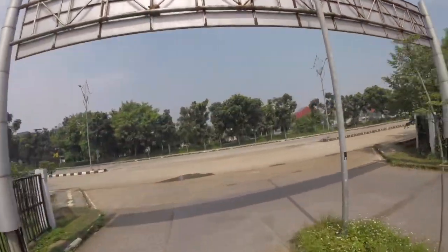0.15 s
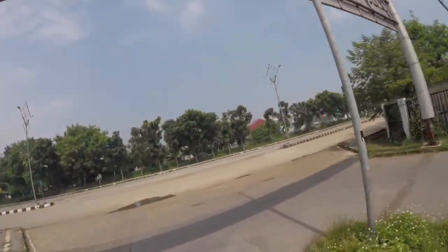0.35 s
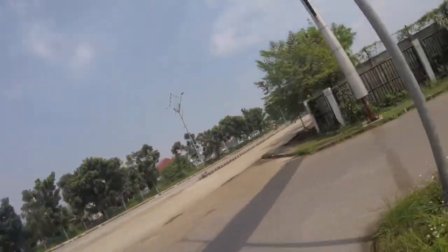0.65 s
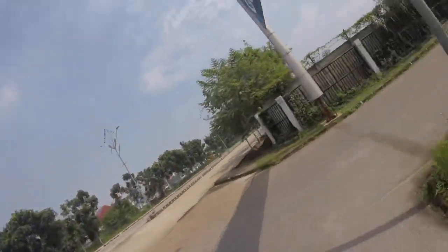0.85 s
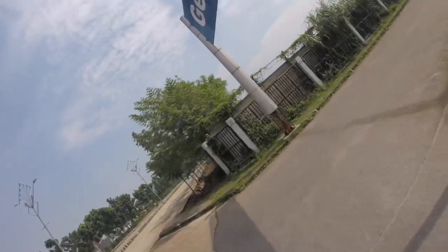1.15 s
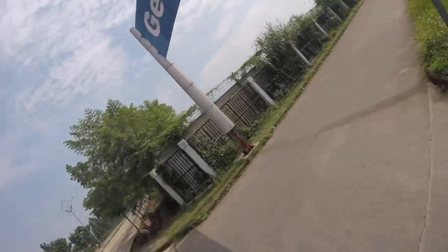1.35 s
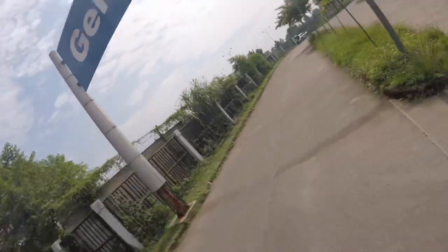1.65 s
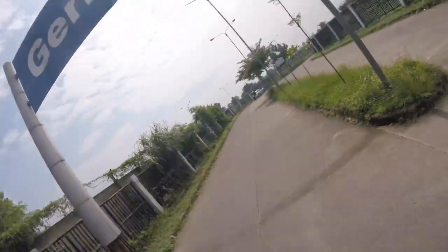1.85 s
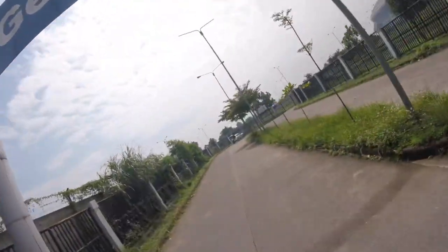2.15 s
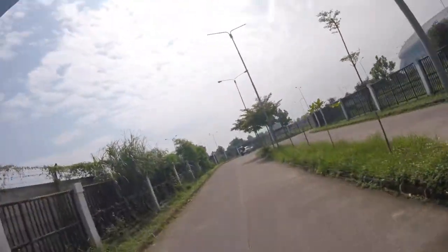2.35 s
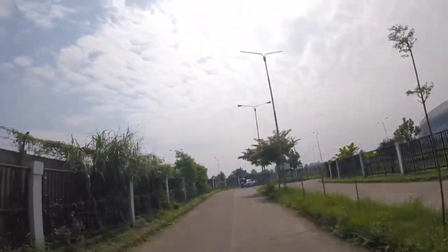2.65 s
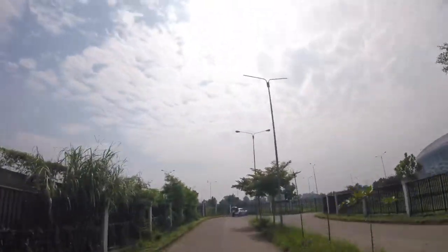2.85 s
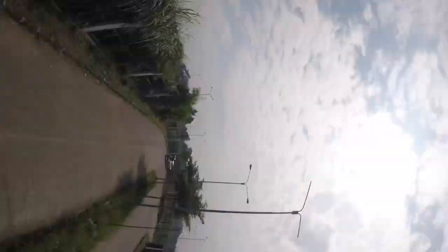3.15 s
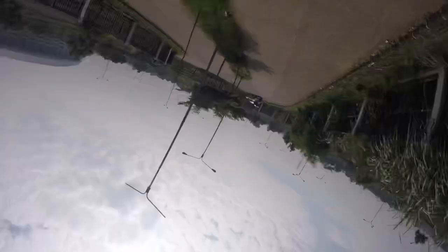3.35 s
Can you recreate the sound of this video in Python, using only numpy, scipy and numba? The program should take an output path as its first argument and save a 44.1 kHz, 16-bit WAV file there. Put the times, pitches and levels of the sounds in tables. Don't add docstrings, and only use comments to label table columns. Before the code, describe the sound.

Small racing drone motors whine and beat, swooping in pitch before a low warbling throttle cut.

```python
import sys
import numpy as np
from scipy import signal
from scipy.fft import rfft, irfft
from scipy.io import wavfile
from scipy.ndimage import uniform_filter1d
from numba import njit

SR = 44100
rng = np.random.default_rng(int(sys.argv[2]) if len(sys.argv) > 2 else 0)


def magnitude_from_level(level_db):
    exponent = np.asarray(level_db, float) / 20
    return 10 ** exponent


def log_audio(samples):
    frames = np.atleast_2d(samples).T
    limited = np.clip(frames, -1, 1)
    pcm = np.round(limited * 32767).astype(np.int16)
    wavfile.write(sys.argv[1], SR, pcm)


N = 154350
t = np.arange(N) / SR

# t/s, shaft f/Hz, hum level/dB, blade level/dB
REAR_SHAFT = [(0, 267.1, -14.5, -37.5), (.4, 271.4, -17, -38), (.455, 236, -17, -34.5),
              (.57, 233.7, -20.5, -33), (.74, 239.7, -11, -35), (.8, 263.8, -17, -39), (.93, 289, -21, -34),
              (1.14, 269.7, -15, -33.5), (1.24, 270.4, -14.5, -34), (1.31, 241.4, -14, -34),
              (1.46, 239.5, -15, -34), (1.72, 251.6, -17, -41.5), (1.8, 258.1, -16, -43.5),
              (2.02, 264.5, -16, -50.5), (2.1, 263.1, -15.5, -44), (2.17, 229.2, -16, -39.5),
              (2.22, 215.8, -18, -41), (2.38, 213, -21, -44), (2.44, 246.5, -28.5, -41),
              (2.48, 261, -23, -36), (2.61, 306.5, -30.5, -41), (2.71, 329.4, -38.5, -40.5),
              (2.875, 337.4, -33.5, -45.5), (2.935, 262, -20.5, -44), (3.0, 161, -24, -38),
              (3.1, 161.6, -28.5, -32.5), (3.18, 159, -28, -30)]
# t/s, shaft f/Hz, hum level/dB, blade level/dB
FRONT_SHAFT = [(0, 213.8, -59, -28), (.07, 226.1, -32, -34.5), (.31, 220.5, -38, -35),
               (.41, 216.7, -25.5, -32), (.49, 186.2, -48, -40), (.6, 182.4, -36, -32),
               (.69, 188.6, -48, -34), (.75, 184.7, -41, -33), (.81, 202.1, -73, -40.5),
               (.93, 214.3, -35, -34.5), (1.0, 235.6, -30, -36.5), (1.22, 233.7, -29.5, -34),
               (1.32, 199.9, -38, -37.5), (1.65, 200, -32, -34), (1.85, 216, -30.5, -43),
               (2.1, 219.2, -32, -39), (2.18, 172, -33, -37.5), (2.37, 176.4, -47, -35.5),
               (2.45, 203, -45, -40), (2.52, 222, -22, -45), (2.62, 267.7, -28.5, -34),
               (2.7, 282, -31.5, -34.5), (2.8, 295.7, -31.5, -36.5), (2.885, 287.4, -28, -33.5),
               (2.94, 241.2, -24, -53), (2.99, 179.9, -25.5, -42), (3.05, 188.6, -37, -36),
               (3.12, 184, -46, -41.5)]
# t/s, shaft f/Hz, hum level/dB, blade level/dB
OTHER_FRONT_SHAFT = [(0, 197, -49, -41), (.3, 207, -36, -40), (.41, 202, -47, -40), (.52, 164, -35, -31),
                     (.74, 158, -30, -47), (.9, 188, -41, -41), (1.1, 203, -32, -36),
                     (1.22, 211, -30.5, -41), (1.33, 193, -35, -39), (1.65, 196, -41, -40.5),
                     (1.85, 205, -49, -40.5), (2.1, 196, -45, -41), (2.2, 152, -63, -30.5),
                     (2.38, 155, -41, -35.5), (2.5, 200, -36, -37), (2.64, 255, -53, -43),
                     (2.86, 258, -71, -55), (2.99, 133, -27, -27), (3.12, 143, -69, -28)]
# t/s, lead/turns
REAR_LEAD = [(.02, 0), (.13, .5), (.27, 1), (.445, .5), (.562, -.5), (.624, -1), (.903, .5), (1.028, 2.5),
             (1.209, 4.5), (1.32, 5), (1.472, 4.5), (1.578, 3.5), (1.878, -.5), (1.942, -1.5),
             (1.991, -2.5), (2.143, -6.5), (2.264, -8.5), (2.38, -9.5), (2.49, -10), (2.93, -10),
             (2.962, -9.5), (3.015, -8.5), (3.045, -8)]
# t/s, level/dB
REAR_BALANCE = [(0, -22), (.3, -7.5), (.55, -3), (.72, -3), (.95, -10.5), (1.3, -13.5), (1.6, -5),
                (2.2, -4.5), (2.5, 10.5), (2.92, 1.5), (2.96, 3.5), (3.02, 4.5), (3.05, 10.5)]
# t/s, level/dB
SUM_TONE_LEVEL = [(.4, -50), (.47, -36.5), (.74, -35), (.85, -41), (1.1, -50), (1.5, -45.5), (2.1, -42.5),
                  (2.3, -60)]
# multiple of the
# shaft/1, level/dB
ROTOR_OVERTONES = [(2, -12), (3, -2.5), (4, -21), (6, -21.5), (9, -27), (12, -36), (15, -30), (21, -34)]
# f/Hz, level/dB
CASE_COLOUR = [(430, -7), (510, 0), (1400, 1), (2350, 6), (2750, 2), (3200, 1), (4200, -12), (5000, 6)]
# t/s, rear level/dB, front level/dB
BLADE_BITE = [(0, 3, -8), (.4, 3, -8), (.5, -3, -4), (.75, 2, -4), (.95, -2, 4), (1.22, -6, 5),
              (1.35, -7, -1), (1.72, -6, -2), (1.8, 9, -5), (2.1, 10, -9), (2.2, -4, -6), (2.42, -3, -6),
              (2.53, -6, -8), (2.62, 6, 0), (2.88, 8, -2), (2.95, -16, -16)]
# t/s, level/dB
THRUST_LEVEL = [(0, -39), (.07, -48.5), (.14, -45), (.4, -42.5), (.49, -45.5), (.57, -43), (.64, -43),
                (.72, -42), (.77, -44), (.9, -40.5), (1.0, -40), (1.17, -41.5), (1.38, -48), (1.48, -43.5),
                (2.1, -45), (2.3, -47.5), (2.4, -45.5), (2.53, -40.5), (2.67, -40.5), (2.8, -44),
                (2.9, -44.5), (2.94, -50), (3.14, -50), (3.19, -55), (3.3, -59.5), (3.35, -62.5),
                (3.41, -57), (3.5, -61.5)]
# f/Hz, density/dB per Hz
HISS_SPECTRUM = [(3600, -39), (4350, -14), (4950, -2), (6000, -7), (6600, -3), (9400, -3.5), (11500, -17.5),
                 (15100, -31)]
# f/Hz, density/dB per Hz
SWISH_SPECTRUM = [(1200, -8), (1800, -21.5), (2700, 2), (4300, -2)]
# f/Hz, density/dB per Hz
WASH_SPECTRUM = [(100, 1), (200, 5.5), (500, -3.5), (900, -3.5), (1150, -7), (1390, -3), (1600, -15),
                 (2700, -24)]
# f/Hz, density/dB per Hz
WIND_SPECTRUM = [(20, -13), (45, -1), (90, -5.5), (140, -15), (250, -19)]
# t/s, level/dB
GUST_LEVEL = [(0, -48), (.09, -50), (.44, -47), (.57, -34), (.64, -45), (.79, -36), (.84, -36), (.93, -31),
              (1.11, -44.5), (1.3, -48), (1.8, -42.5), (1.93, -41), (2.2, -38), (2.31, -44), (2.4, -40),
              (2.55, -35), (2.7, -37), (2.84, -43), (2.88, -31), (2.96, -41), (3.05, -52), (3.2, -40.5),
              (3.5, -43)]
# f/Hz, density/dB per Hz
BUFFET_SPECTRUM = [(120, -6), (400, 3), (600, -9)]
# t/s, blade f/Hz, level/dB
ROLL_BLADE = [(3.12, 470, -42), (3.15, 400.7, -24), (3.2, 375, -24.5), (3.24, 385, -36.5),
              (3.265, 356.6, -30), (3.295, 367, -29), (3.33, 336, -59), (3.38, 288.6, -49),
              (3.41, 361, -36), (3.45, 336, -45), (3.5, 248, -55)]
# t/s, blade f/Hz, level/dB
OTHER_ROLL_BLADE = [(3.12, 330.8, -58), (3.16, 315.5, -18.5), (3.195, 254.4, -27), (3.22, 256.8, -13),
                    (3.245, 302.7, -29), (3.275, 324.4, -20), (3.3, 315.3, -37), (3.32, 300, -22.5),
                    (3.345, 260.3, -28.5), (3.37, 199, -33.5), (3.395, 262, -28), (3.42, 333, -22),
                    (3.445, 270, -28.5), (3.47, 208.6, -24.5), (3.5, 206, -26)]

SPEED_JITTER = 0.00302
UNLOAD_S, ROLL_S, HUM_CUT_S = 2.94, 3.13, 3.175


def curve(table, col=1):
    rows = np.array(table, float)
    lane = np.interp(t, rows[:, 0], rows[:, col])
    return uniform_filter1d(lane, size=1200)


def walk(rate_hz):
    knots = rng.standard_normal(int(N / SR * rate_hz) + 2)
    return 1.203 * np.interp(t * rate_hz, np.arange(len(knots)), knots)


def shaft_angle(hz, jitter=SPEED_JITTER):
    return 2 * np.pi * np.cumsum(hz * (1 + jitter * walk(40.03))) / SR


def rotor(angle, hum_db, blade_db, bite_db):
    hz = uniform_filter1d(np.gradient(angle), size=800) * SR / (2 * np.pi)
    hz = np.maximum(hz, 20)
    frame_db = 7.5 / (1 + ((hz - 262) / 63.5) ** 2)
    out = magnitude_from_level(hum_db + frame_db) * np.sin(angle)
    case_hz, case_db = np.array(CASE_COLOUR, float).T
    for order, order_db in ROTOR_OVERTONES:
        level_db = blade_db + order_db + np.interp(np.log(order * hz), np.log(case_hz), case_db)
        if order > 4:
            level_db = level_db + bite_db + 2.2 * walk(9)
        if order > 12:
            level_db = level_db + 0.16 * (hz - 330)
        level_db = level_db + 1.5 * walk(24.68)
        out = out + magnitude_from_level(level_db) * np.sin(order * angle + order)
    return out


def roll_fade():
    return -40 * np.clip((t - ROLL_S) / 0.02, 0, 1)


def flying_rotors():
    jitter = SPEED_JITTER * (1 + 5.6 * (t > UNLOAD_S))
    rear = shaft_angle(curve(REAR_SHAFT), jitter)
    front = shaft_angle(curve(FRONT_SHAFT), jitter)
    other = shaft_angle(curve(OTHER_FRONT_SHAFT), jitter)
    second_rear = rear + 2 * np.pi * curve(REAR_LEAD)
    fade = roll_fade()
    hum_cut = -27 * np.clip((t - HUM_CUT_S) / 0.012, 0, 1)
    hum_db = curve(REAR_SHAFT, col=2) - 5.5 + hum_cut
    blade_db = curve(REAR_SHAFT, col=3) + fade
    rear_bite, front_bite = curve(BLADE_BITE), curve(BLADE_BITE, col=2)

    out = rotor(rear, hum_db, blade_db, rear_bite)
    out = out + rotor(second_rear, hum_db + curve(REAR_BALANCE), blade_db - 3, rear_bite - 5)
    out = out + rotor(front, curve(FRONT_SHAFT, col=2) - 3.5 + fade,
                      curve(FRONT_SHAFT, col=3) + fade, front_bite)
    out = out + rotor(other, curve(OTHER_FRONT_SHAFT, col=2) - 1.5 + fade,
                      curve(OTHER_FRONT_SHAFT, col=3) + fade, front_bite - 4)
    out = out + magnitude_from_level(curve(SUM_TONE_LEVEL) + 1.8 * walk(22)) * np.sin(rear + front)
    return np.sqrt(2) * out, 3 * front


def noise(spectrum, flicker_db, swell_db, rate_hz):
    rows = np.array(spectrum, float)
    low_hz, high_hz = rows[0, 0], rows[-1, 0]
    f = np.maximum(np.arange(N // 2 + 1) * SR / N, 1)
    shape = magnitude_from_level(np.interp(np.log(f), np.log(rows[:, 0]), rows[:, 1], left=-90, right=-90))
    spec = rfft(rng.standard_normal(N)) * shape
    place = 2 * np.log2(f / low_hz)
    out = 0
    for k in range(int(2 * np.log2(high_hz / low_hz)) + 2):
        band = irfft(spec * np.clip(1 - abs(place - k), 0, 1), N)
        out = out + band * magnitude_from_level(flicker_db * walk(rate_hz) + swell_db)
    return out / out.std()


def resonance(x, hz, width_hz):
    return signal.lfilter(*signal.iirpeak(hz, hz / width_hz, fs=SR), x)


def tip_hiss(blade_angle, thrust_db, swell_db):
    hiss = noise(HISS_SPECTRUM, 0.88, swell_db, 11.81)
    hiss = hiss + 0.82 * resonance(hiss, 6530, 640)
    hiss = hiss - 0.35 * resonance(hiss, 6020, 230)
    notch_depth = 1 - magnitude_from_level(np.minimum(thrust_db + 46, 0))
    hiss = hiss - notch_depth * resonance(hiss, 5350, 3300)
    hiss = hiss * (1 + 0.38 * np.sin(blade_angle))
    swish = noise(SWISH_SPECTRUM, 1.4, swell_db, 28.07) * magnitude_from_level(-15.5)
    return (hiss + swish) * magnitude_from_level(thrust_db)


def prop_wash(thrust_db, swell_db):
    level_db = -37.5 + 0.47 * (thrust_db - thrust_db.mean())
    return noise(WASH_SPECTRUM, 1.7, swell_db, 11) * magnitude_from_level(level_db)


def wind():
    return noise(WIND_SPECTRUM, 1.2, 1.7 * walk(12), 8.6) * magnitude_from_level(curve(GUST_LEVEL))


def wake_buffet(swell_db):
    onset = np.clip((t - UNLOAD_S) * 20, 0, 1)
    return magnitude_from_level(-43.5) * noise(BUFFET_SPECTRUM, 3, swell_db, 25) * onset


def roll_blades():
    rise_db = -40 - roll_fade()
    out = 0
    for blade, speed_ratio, trim_db in (
            (ROLL_BLADE, 1, -7), (OTHER_ROLL_BLADE, 1, -8),
            (OTHER_ROLL_BLADE, 0.6, -19), (ROLL_BLADE, 1.32, -16)):
        level_db = curve(blade, col=2) + trim_db + 2.2 * walk(50) + rise_db
        angle = shaft_angle(speed_ratio * curve(blade), jitter=0.012)
        out = out + magnitude_from_level(level_db) * (t > ROLL_S) * np.sin(angle)
    return np.sqrt(2) * out


def scene():
    tones, blade_angle = flying_rotors()
    thrust_db = curve(THRUST_LEVEL)
    swell_db = 0.7 * walk(11.72)
    air = tip_hiss(blade_angle, thrust_db, swell_db) + prop_wash(thrust_db, swell_db)
    air = air + wind() + wake_buffet(swell_db)
    return (magnitude_from_level(3.0) * (tones + air + roll_blades()))[None]


@njit
def follow(x, up, down):
    y, e = np.empty(len(x)), np.abs(x[:400]).max()
    for i in range(len(x)):
        e += (abs(x[i]) - e) * (up if abs(x[i]) > e else down)
        y[i] = e
    return y


def band_limit(x):
    return signal.sosfilt(signal.butter(12, 15160, fs=SR, output="sos"), x)


def record(dry):
    attack_s, release_s = 0.0005, 0.054
    threshold_db, ratio, drive = -21.5, 2.054, 1.71
    envelope = follow(dry[0], 1 / (attack_s * SR), 1 / (release_s * SR))
    gain = np.minimum(magnitude_from_level(threshold_db) / envelope, 1) ** (1 - 1 / ratio)
    mix = np.tanh(drive * dry * gain) / drive
    return band_limit(mix)


dry = scene()
out = record(dry)
log_audio(out)
```